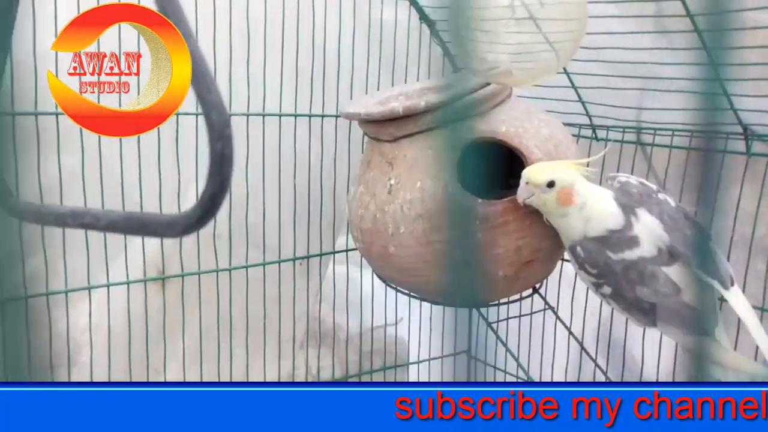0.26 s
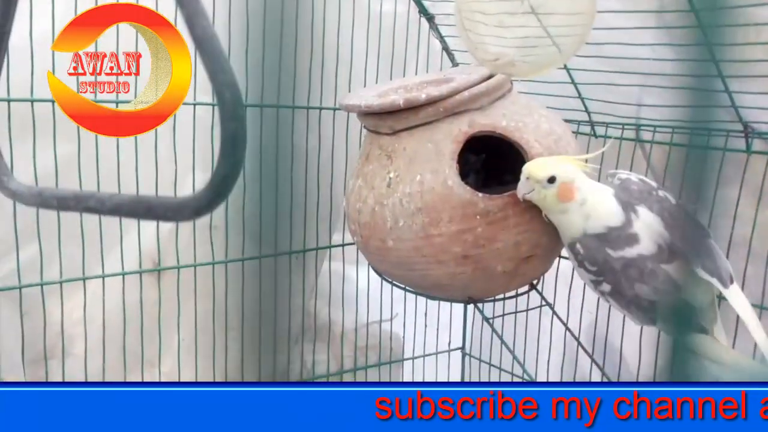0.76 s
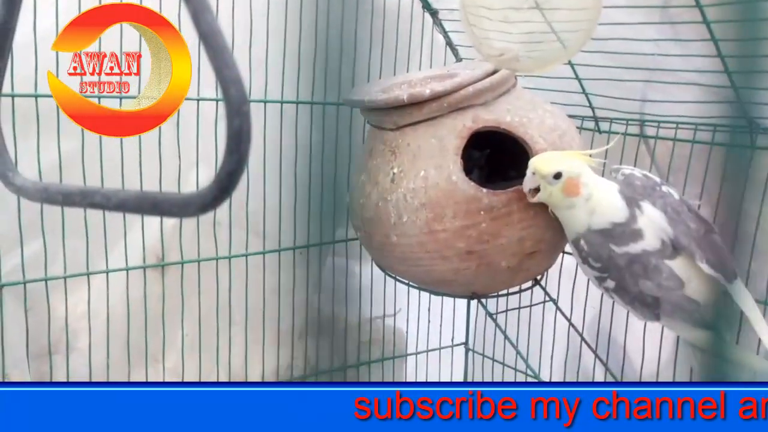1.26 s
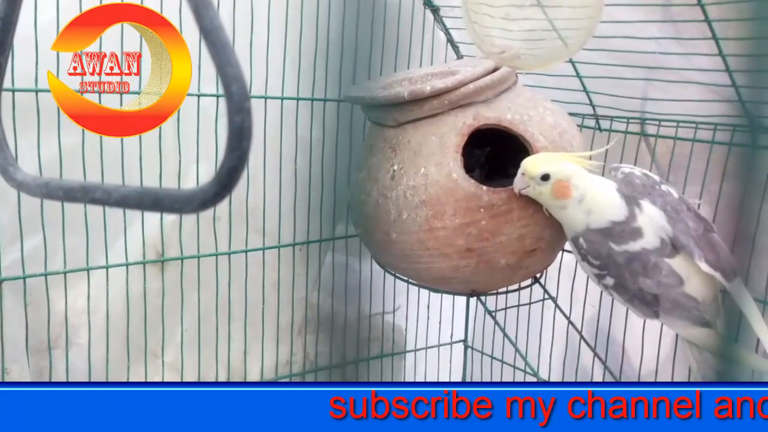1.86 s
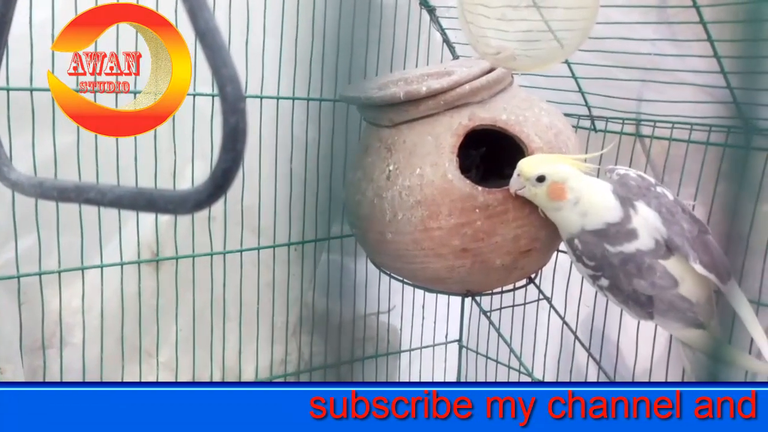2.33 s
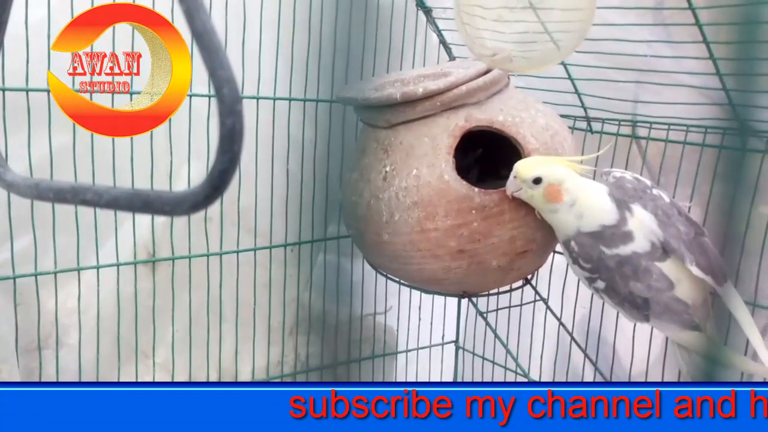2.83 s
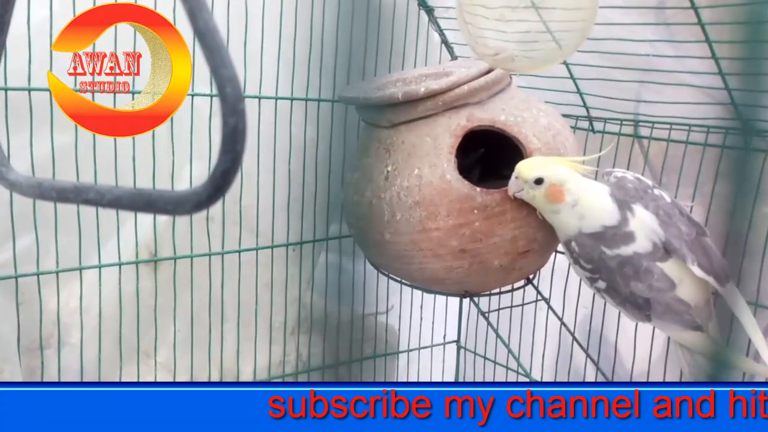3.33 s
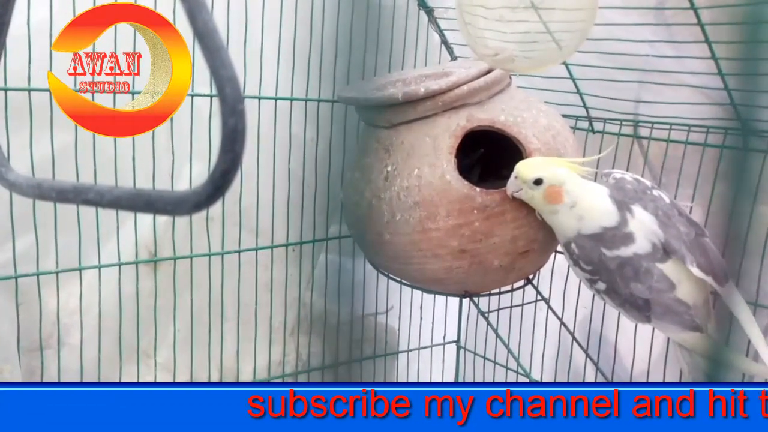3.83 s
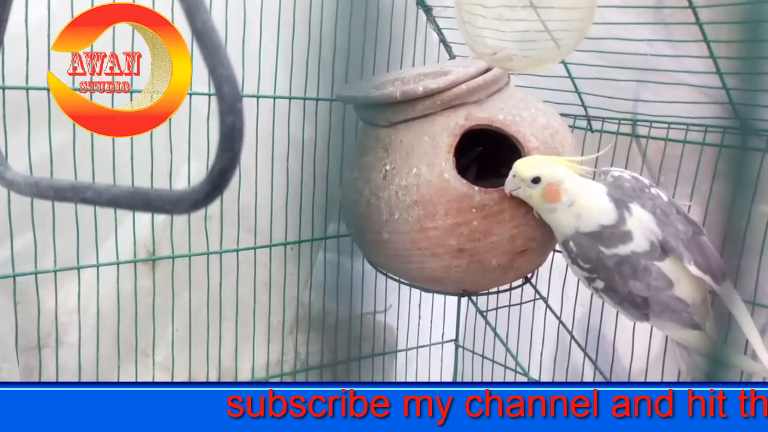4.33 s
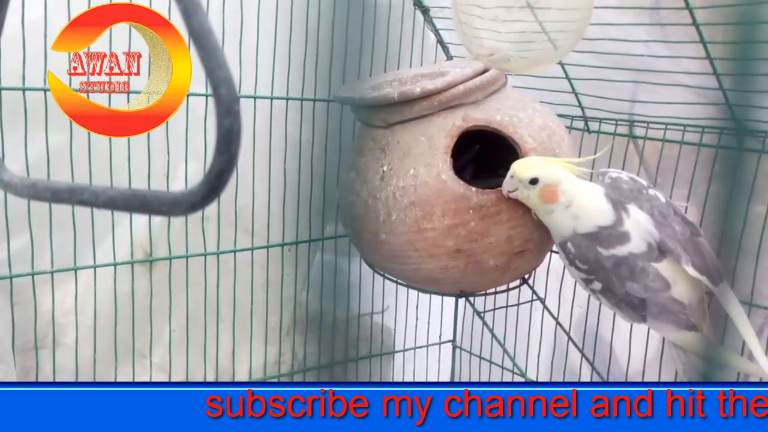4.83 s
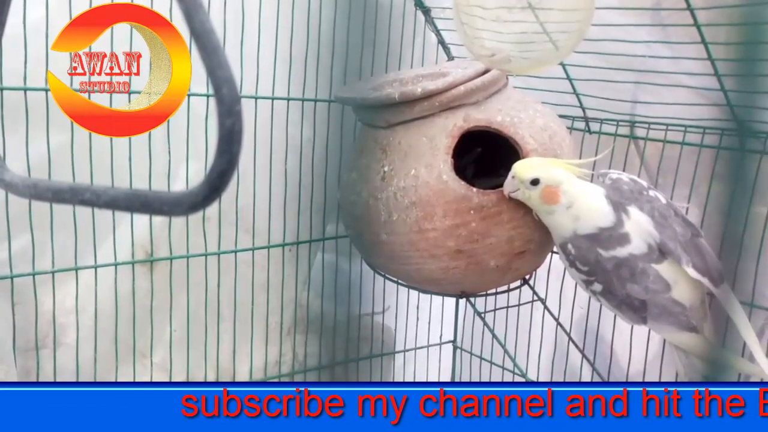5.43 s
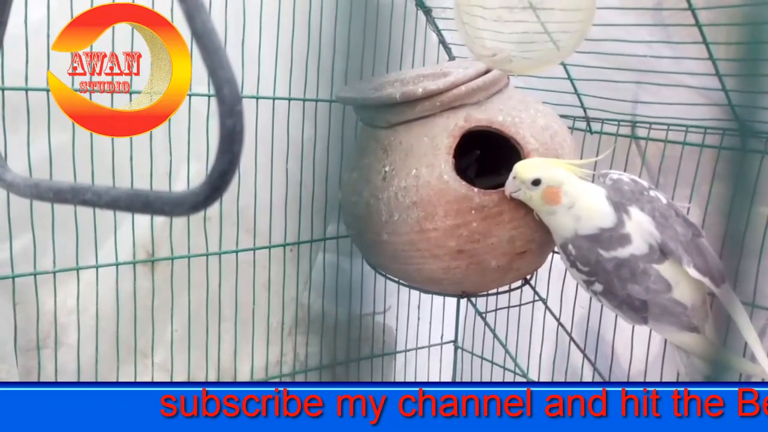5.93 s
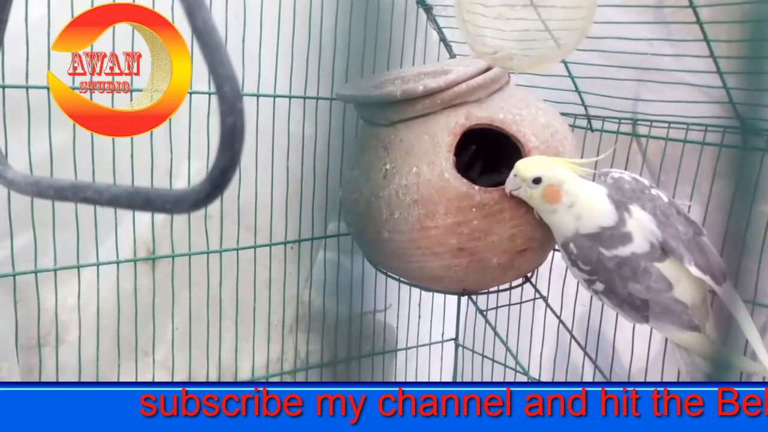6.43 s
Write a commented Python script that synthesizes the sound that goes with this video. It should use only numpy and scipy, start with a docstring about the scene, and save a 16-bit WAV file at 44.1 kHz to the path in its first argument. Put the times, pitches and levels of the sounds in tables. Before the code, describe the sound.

A cockatiel in an indoor wire cage gives fifteen short gliding whistles, close to a hand-held phone. Soft handling thuds and a low, humming knock on the bars come first, then the chirps run in loose groups with a pause around three seconds. Some notes are full and bright, others brief, lower and weak. A short room echo trails each one, over faint low rumble and thin hiss.

```python
"""Indoors, in a wire cage, a cockatiel sings fifteen short whistled chirps close to a hand-held phone.
Each chirp is one gliding tone with overtones, and the second harmonic often takes over.
The nest pot and the room throw the song back as random, fading echoes.
Noise bursts make the soft handling; ringing tones make a knock on the cage; two faint tones come from afar.
Filtered noise makes rumble and hiss, and the phone's crude rate conversion adds a glassy edge."""
import sys
import numpy as np
from scipy import signal
from scipy.fft import rfft, irfft
from scipy.io import wavfile
from scipy.ndimage import uniform_filter1d

SR = 44100
rng = np.random.default_rng(int(sys.argv[2]) if len(sys.argv) > 2 else 0)


def log_audio(samples):
    """Write samples as a 16-bit WAV file to the path given in sys.argv[1]."""
    # one column per channel
    frames = np.atleast_2d(samples).T
    # limit to full scale, then quantise
    limited = np.clip(frames, -1, 1)
    pcm = np.round(limited * 32767).astype(np.int16)
    wavfile.write(sys.argv[1], SR, pcm)


N = 295029
TIME = np.arange(N) / SR

# Steady background noise, as density per Hz: pitch_hz, left_db, right_db
BACKGROUND_LEVELS = [(25, -99, -101), (92, -87, -91), (341, -95.5, -95.5), (756, -96.5, -102),
                     (863, -101, -103), (1331.7, -84.5, -99), (1648, -83.5, -108), (2434, -105, -111),
                     (2362.3, -91.5, -111), (3370, -102.5, -113), (3380.6, -108, -113), (5860, -111, -115),
                     (7824, -123, -123), (13500, -123, -126), (14956, -105, -117)]
# Soft thuds of the hand on the phone: start_s, level_db, fade_by_60_db_s, left_minus_right_db
THUDS = [(.03, -47.5, 1, 30.5), (.18, -45, 1, 8.5), (1.495, -43.5, 0.125, 16.5), (2.612, -50.5, .2, 20),
         (3.69, -46.5, 0.1, 31), (4.595, -33.5, 0.117, 38)]
# Light taps: start_s, level_db, fade_by_60_db_s, left_minus_right_db
TAPS = [(.1, -48, 0.059, 24.5), (.626, -39.5, 0.114, 18)]
# Broad resonances heard in a tap: pitch_hz, width_hz, level_db
TAP_RESONANCES = [(549, 194, 4.5), (870, 780, 4), (1536, 700, -1)]
# Knocks on the cage: start_s, level_db
CAGE_KNOCKS = [(0.169, -28)]
# Ringing tones of the cage bars: pitch_hz, level_db, fade_by_60_db_s
BAR_TONES = [(108.6, -13, 0.94), (182.5, -5.5, 0.98), (208.4, 1.5, 0.78), (224, -10, 0.97), (266, -17.5, 1),
             (335, -24, 0.72), (393, -23, 0.96)]
# Chirps: a held note, a flick up to a crest, and a tail that drops towards the resting pitch:
# start_s, hold_s, rise_s, tail_s, drop_s, hold_start_hz, hold_end_hz, crest_hz, swell_s, hold_db, crest_db,
# catch_db (level change just before the flick), bloom_s (when overtones peak, after the start),
# second_harmonic_db, third_harmonic_db, fundamental_left_minus_right_db, overtones_left_minus_right_db
CHIRPS = [(0.688, 0.03543, 0.0409, 0.00565, .040, 1728, 1681, 1903, 0.0013, -34, -19, -2.5, 0.051, -25.5, -37.5, -16, -9),
          (0.946, 0.09235, 0.0215, 0.0385, .028, 2060, 2138, 2393, 0.00424, -22.5, -22, 6.5, 0.0325, -17.5, -44, -10.5, -13),
          (1.267, 0.1126, 0.01347, 0.0483, .024, 2364, 2217, 2354, 0.01225, -22.5, -21.5, 3.5, 0.077, -14, -41.5, -4, -14),
          (1.689, 0.0671, 0.0355, 0.03282, .022, 1908, 2023, 2262, .038, -18, -20.5, 4.5, 0.15, -44, -47.5, -10, -5.5),
          (1.984, 0.0938, 0.01194, 0.0314, .037, 2284, 2206, 2297, 0.00813, -23.5, -21, 6, 0.067, -14, -37.5, 1, -11.5),
          (2.393, 0.04425, 0.0303, .007, .040, 1450, 1371, 1366, 0.0018, -33, -39, -3, 0.011, -43, -53.5, 1.5, -13.5),
          (3.405, 0.03854, 0.0445, 0.01324, .028, 1827, 1712, 1971, .003, -28, -24, -4.5, 0.0453, -38.5, -48.5, -15.5, -11.5),
          (3.652, 0.10124, 0.01835, 0.0486, .036, 2232, 2261, 2480, 0.0074, -24, -16, 5.5, 0.0747, -15.5, -40, -4, -12),
          (4.009, .047, .060, 0.0757, .045, 2503, 2406, 3284, 0.0015, -21.5, -13.5, -7.5, 0.047, -19.5, -41, -8.5, -9.5),
          (4.43, 0.02, 0.101, 0.0155, .040, 1926, 1860, 2299, 0.0325, -20, -22, -10, 0.204, -48, -53, -12, -11),
          (4.708, .045, 0.038, 0.00634, .040, 2466, 2374, 2578, 0.00274, -24.5, -19, 1.5, 0.0799, -18, -36.5, -4, -10),
          (5.108, 0.04076, 0.0306, .014, .028, 1536, 1606, 1833, .003, -33, -32.5, 0, .030, -61, -56, -18, -8.5),
          (5.482, 0.0374, 0.0277, .007, .040, 1466, 1424, 1416, .003, -32, -40, -3, .012, -41, -41, -6, -13.5),
          (6.081, 0.03934, 0.03434, 0.01067, .030, 1760, 1753, 1978, .002, -29, -20.5, -7.5, 0.0335, -20, -36, -16, -15.5),
          (6.323, 0.0886, 0.0198, 0.0347, .040, 2217, 2195, 2364, 0.00937, -17.5, -20, -3, 0.0833, -18, -41, -6, -10)]
# Rise and fall of the second and third harmonics: onset_db, from_crest_db, share_of_bloom_time (no unit)
OVERTONE_ARCHES = [(-10.5, -23.5, 1), (-7.5, -12, .7)]
# Thin rasp that rides on every note: pitch_hz, width_hz, level_db
RASP_BANDS = [(6140, 700, -5), (10400, 1500, -2), (14237, 4000, 7.5)]
# Faint far-off tones: middle_s, half_length_s, pitch_hz, level_db
FAR_TONES = [(5.804, 0.0368, 612, -61), (6.581, 0.0366, 782, -59)]

TOP_HZ = 15500  # upper limit of the harmonics, the room's treble and the final sound
ATTACK_S, RELEASE_S = .003, .006
BAR_RATTLE = .28  # unevenness of the bars' phase (radians) and of their strength (as a share)
ONSET_SHARP, SETTLE_S = 0.08199, .006  # a note starts sharp by this share, then settles
REST_HZ, DROP_POWER = 1272, 3.2  # where the slack syrinx ends up, and how abruptly it lets go
SOFT_ONSET_DB, TAIL_DB_PER_S, CATCH_S = -20.5, -290, .007
OVERTONE_ONSET_DB, OVERTONE_TAIL_DB_PER_S = -15.5, -350  # overtones speak later and die sooner
FLUTTER_DB, TREMBLE = 1.4, .0055  # random wavering of level, and of pitch as a share
FRAYED_FLUTTER = 0.13  # extra flutter, in dB for each dB that a harmonic lies under the leading one
PUSH_S = 0.035  # how fast the extra push of the flick dies away after the crest
PORT_LAG_S = .000262
NEAR_T60_S, NEAR_DB = .11, -13
ROOM_T60_S, ROOM_TREBLE_T60_S, ROOM_DB = 0.4943, 0.25, -21
CAPTURE_RATE, BLOCK = 48000, 1024  # samples per second, and samples per conversion block


def undb(db):
    """Turn decibels into gain."""
    return 10 ** (np.asarray(db) / 20)


def unit(x):
    """Scale to an average strength (rms) of 1."""
    return x / np.sqrt(np.mean(x ** 2))


def ports(pan_db):
    """Gains for the left and right microphone ports, with a mean power of 1."""
    return unit(undb(np.array([[pan_db], [-pan_db]]) / 2))


def band(x, lo_hz, hi_hz, order=2):
    """Keep the sound between two pitches."""
    hi_hz = min(hi_hz, SR / 2 - 1)
    return signal.sosfilt(signal.butter(order, [lo_hz, hi_hz], "band", fs=SR, output="sos"), x)


def wobble(size, rate):
    """Random motion: straight lines join random values, with `rate` values per second."""
    place = np.arange(size) * rate / SR
    return np.interp(place, np.arange(size), rng.standard_normal(size))


def fade(t, t60):
    """Silent before t = 0, then fading by 60 dB every t60 seconds."""
    return (t >= 0) * np.exp(-np.log(1000) * np.abs(t) / t60)


def ease(u):
    """Smooth step from 0 to 1."""
    return np.sin(np.clip(u, 0, 1) * np.pi / 2) ** 2


def bump(t, width_s):
    """Bell curve around t = 0."""
    return np.exp(-(t / width_s) ** 2)


def resonant_noise(size, peaks):
    """Noise passed through a few broad resonances, with an rms of 1."""
    total = 0
    for hz, width, db in peaks:
        hiss = rng.standard_normal(size)
        total = total + undb(db) * unit(band(hiss, hz - width / 2, hz + width / 2))
    return unit(total)


def background(shared_hz=350, waver_db=2.5):
    """Low room rumble common to both ports, and each port's own hiss, from noise shaped by pitch."""
    f = np.maximum(np.arange(N // 2 + 1) * SR / N, 1)
    hz, *sides = np.transpose(BACKGROUND_LEVELS)
    common, *own = rfft(rng.standard_normal((3, N)))
    # the lower the pitch, the more of the noise both ports share
    share = 1 / (1 + (f / shared_hz) ** 2)
    noise = np.sqrt(share) * common + np.sqrt(1 - share) * np.array(own)
    colour = undb([np.interp(np.log(f), np.log(hz), db) for db in sides])
    return irfft(noise * colour, N) * np.sqrt(SR / 2) * undb(waver_db * wobble(N, 2.892))


def bursts(table, colour):
    """Short bursts of one coloured noise, each with a softened start and a fading end."""
    total = 0
    for start_s, db, t60, pan_db in table:
        envelope = uniform_filter1d(fade(TIME - start_s, t60), size=330)
        total = total + undb(db) * ports(pan_db) * envelope * unit(colour)
    return total


def handling(creak_db=-12):
    """Dull thuds through the phone's case are low noise with a fainter creak; hollow taps are resonant noise."""
    low = unit(band(rng.standard_normal(N), 75, 150, order=3))
    creak = unit(band(rng.standard_normal(N), 340, 620))
    thud = low + undb(creak_db) * creak
    return bursts(THUDS, thud) + bursts(TAPS, resonant_noise(N, TAP_RESONANCES))


def cage_knock(pan_db=2, rise_s=0.025):
    """A soft knock sets the bars humming as fading tones; their loose joints make the ring uneven."""
    out = 0
    for start_s, db in CAGE_KNOCKS:
        t = TIME - start_s
        for hz, tone_db, t60 in BAR_TONES:
            ring = np.sin(2 * np.pi * hz * t + BAR_RATTLE * wobble(N, 60))
            ring = ring * (1 + BAR_RATTLE * wobble(N, 45))
            out = out + undb(db + tone_db) * fade(t, t60) * np.clip(t / rise_s, 0, 1) * ring
    return out * ports(pan_db)


def arch(t, bloom_s, crest_s, onset_db, closed_db, share):
    """Overtone level below its peak: the throat opens until it blooms, then closes towards the crest."""
    peak_s = max(share * bloom_s, ATTACK_S)
    opening = np.clip(1 - t / peak_s, 0, 1)
    closing = np.clip((t - peak_s) / max(crest_s - peak_s, RELEASE_S), 0, 1)
    return onset_db * opening ** 2 + closed_db * closing ** 2


def gesture(t, row):
    """Pitch and three harmonic levels as the syrinx settles, holds, catches, flicks up and lets go."""
    _, hold_s, rise_s, _, drop_s, start_hz, end_hz, crest_hz = row[:8]
    swell_s, hold_db, crest_db, catch_db, bloom_s, *overtones_db = row[8:-2]
    crest_s = hold_s + rise_s
    unsettled = np.exp(-t / SETTLE_S)
    flick = ease((t - hold_s) / rise_s)
    after = np.maximum(t - crest_s, 0)  # seconds since the crest
    # the pitch holds, rises to the crest, then drops towards rest
    held = np.interp(t, [0, hold_s], [start_hz, end_hz]) * (1 + ONSET_SHARP * unsettled)
    risen = held + (crest_hz - held) * flick
    hz = REST_HZ + (risen - REST_HZ) * np.exp(-(after / drop_s) ** DROP_POWER)
    # all levels swell, shift briefly around the start of the flick, and fade in the tail
    swell_db = SOFT_ONSET_DB * np.exp(-t / swell_s)
    effort_db = swell_db + catch_db * bump(t - hold_s, CATCH_S) + TAIL_DB_PER_S * after
    dull_db = OVERTONE_ONSET_DB * unsettled + OVERTONE_TAIL_DB_PER_S * after
    overtones = [db + dull_db + arch(t, bloom_s, crest_s, *shape)
                 for db, shape in zip(overtones_db, OVERTONE_ARCHES)]
    fundamental_db = hold_db + (crest_db - hold_db) * flick
    return hz, effort_db + np.array([fundamental_db, *overtones])


def chirp(row, upper_db=-14, slope_db=-4, fray=0.13, strain_fray=0.42, rasp_db=-39, rasp_growth=0.821,
          strain_db=4, push_db=7.5, fast_glide=8.3):
    """One note: the syrinx glides with a slight tremble, and the throat favours one harmonic or another."""
    start_s, hold_s, rise_s, tail_s = row[:4]
    start, beam = int(start_s * SR), row[-2:]
    t = TIME[:int((hold_s + rise_s + tail_s) * SR)]
    hz, (first_db, second_db, third_db) = gesture(t, row)
    # fast glides (relative change of pitch per second) strain the syrinx and roughen the tone
    glide = uniform_filter1d(np.abs(np.gradient(np.log(hz))) * SR, size=1100)
    strain = np.tanh(glide / fast_glide) ** 2
    hz = hz * (1 + TREMBLE * wobble(len(t), 500))
    # the right port is nearer to the beak, so the left one hears it later
    phase = 2 * np.pi * (np.cumsum(hz) / SR - hz * np.array([[PORT_LAG_S], [0]]))
    # three more harmonics follow the third, each weaker than the one before
    levels = [first_db, second_db, third_db] + [third_db + upper_db + k * slope_db for k in range(3)]
    # harmonics well below the stronger of the first two fray into noise
    lead_db = np.maximum(first_db, second_db)
    note = 0
    for k, db in enumerate(levels, 1):
        under_db = np.clip(lead_db - db, 0, 30)
        flutter_db = (FLUTTER_DB + FRAYED_FLUTTER * under_db) * wobble(len(t), 250)
        gain = undb(db + flutter_db) * (k * hz < TOP_HZ)
        scatter = (fray + strain_fray * strain) * under_db / 10
        tone = np.sin(k * phase + scatter * wobble(len(t), 1200))
        note = note + np.sqrt(2) * gain * tone * ports(beam[min(k - 1, 1)])
    # the rasp grows more slowly than the tone, so soft notes sound huskier; it flares with the flick's push
    rasp = np.array([resonant_noise(len(t), RASP_BANDS) for port in range(2)])
    push = ease((t - hold_s) / rise_s) * bump(np.maximum(t - hold_s - rise_s, 0), PUSH_S)
    rasp_level_db = rasp_db + rasp_growth * first_db + strain_db * strain + push_db * push
    note = note + undb(rasp_level_db) * rasp
    gate = np.clip((t - t[0]) / ATTACK_S, 0, 1) * np.clip((t[-1] - t) / RELEASE_S, 0, 1)
    return start, note * ease(gate)


def cockatiel():
    """The bird's song: every chirp's gliding harmonics and rasp, placed at its start time."""
    out = np.zeros((2, N))
    for row in CHIRPS:
        start, note = chirp(row)
        out[:, start:start + note.shape[1]] += note
    return out


def room(x, split_hz=3400, gap_s=0.0038):
    """Quick reflections from pot and walls, then a faint tail whose treble dies sooner, as fading noise."""
    t = TIME[:SR] - gap_s
    near, low, high = rng.standard_normal((3, 2, SR))
    near = near * fade(t, NEAR_T60_S)
    low_tail = band(low, 100, split_hz) * fade(t, ROOM_T60_S)
    treble_tail = band(high, split_hz, TOP_HZ) * fade(t, ROOM_TREBLE_T60_S)
    tail = low_tail + treble_tail
    response = (undb(NEAR_DB) * unit(near) + undb(ROOM_DB) * unit(tail)) / np.sqrt(SR)
    return signal.fftconvolve(x, response, axes=1)[:, :N]


def far_tones(waver=0.88, pan_db=4):
    """Two soft tones from far away swell and fade; random shifts of phase make them waver."""
    tones = 0
    for middle_s, half_s, hz, db in FAR_TONES:
        tone = np.sin(2 * np.pi * hz * TIME + waver * wobble(N, 50))
        tones = tones + undb(db) * bump(TIME - middle_s, half_s) * tone
    return tones * ports(pan_db)


def scene():
    """The bird and its echo, with the small noises around the phone."""
    bird = cockatiel()
    return background() + handling() + cage_knock() + bird + room(bird) + far_tones()


def record(dry, jitter=0.0074):
    """Converting the rate by picking the nearest sample gives tones sidebands and a fine grit."""
    captured = signal.resample_poly(dry, CAPTURE_RATE, SR, axis=1)
    place = np.arange(N) * CAPTURE_RATE / SR
    block = (place // BLOCK).astype(int)
    # each block slips by a random part of a sample, and each pick jitters a little more
    slip = .15 * rng.uniform(-1, 1, block[-1] + 1)
    place = place + slip[block] + jitter * rng.standard_normal(N)
    nearest = np.clip(np.round(place).astype(int), 0, captured.shape[1] - 1)
    picked = captured[:, nearest]
    # a steep filter takes away the highest treble
    return signal.sosfilt(signal.ellip(10, .2, 70, TOP_HZ, fs=SR, output="sos"), picked)


dry = scene()
out = record(dry)
log_audio(out)
```